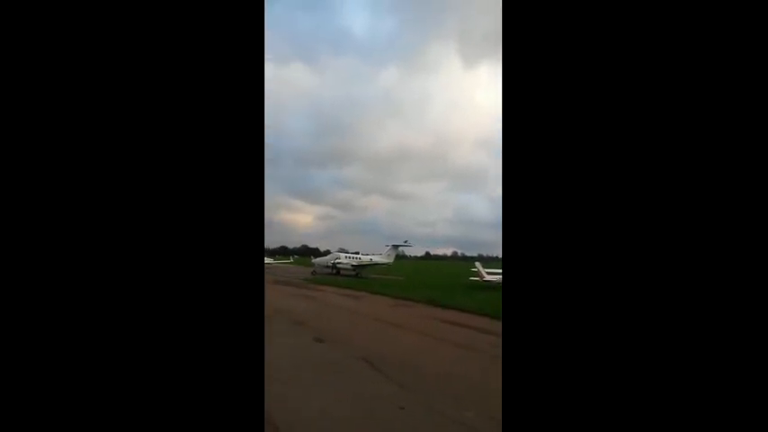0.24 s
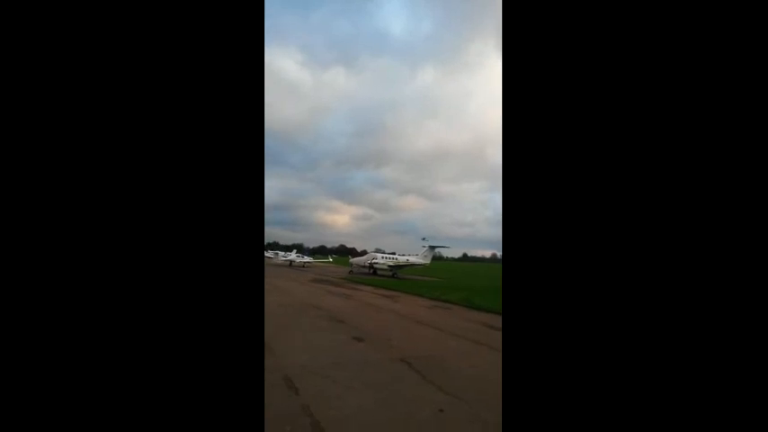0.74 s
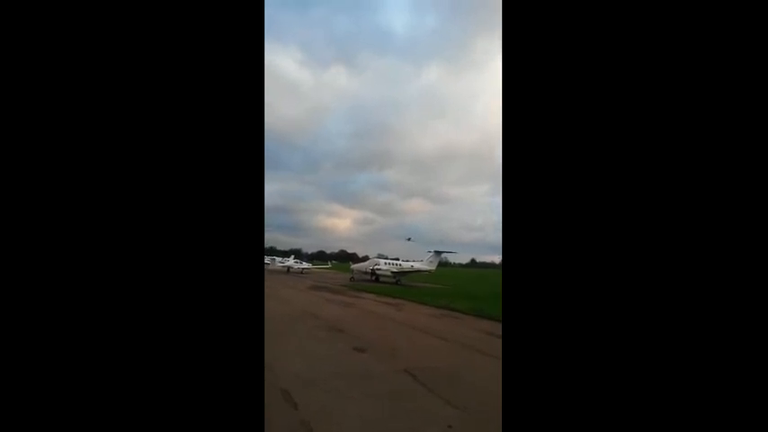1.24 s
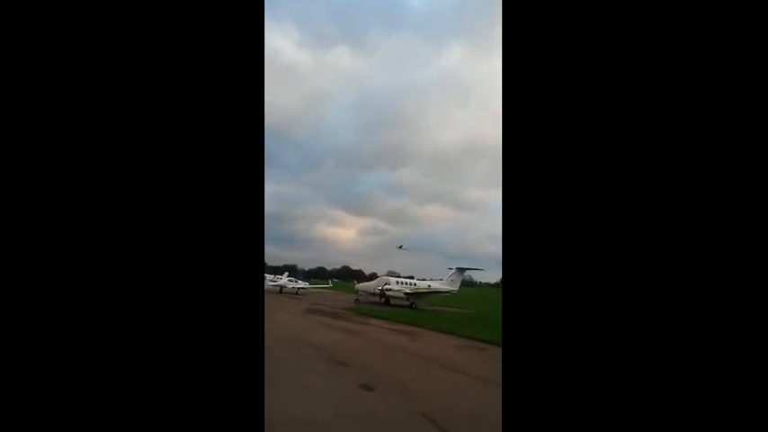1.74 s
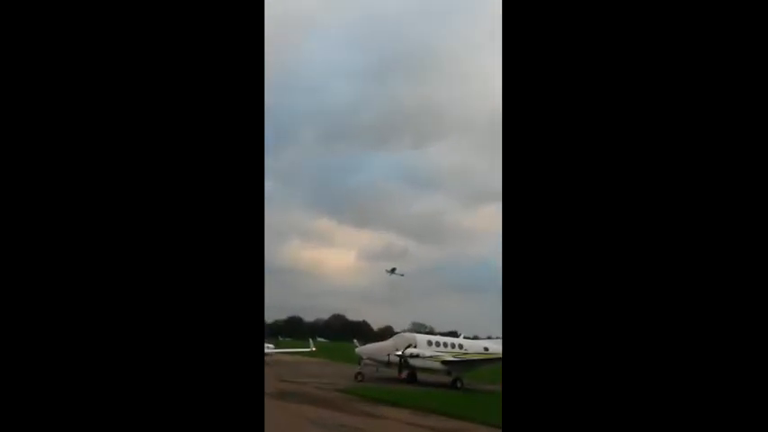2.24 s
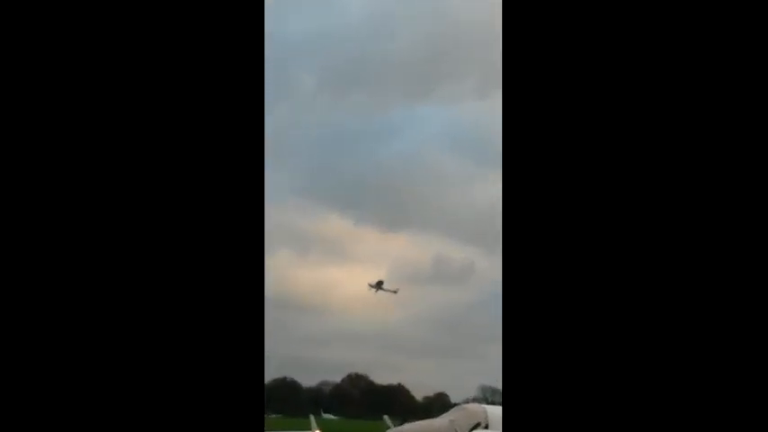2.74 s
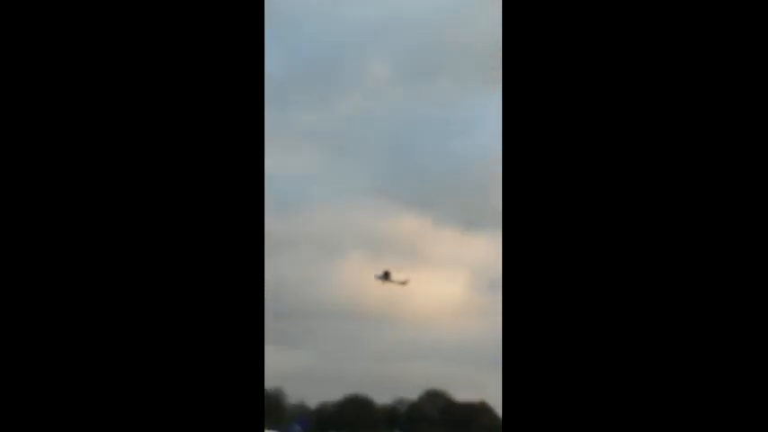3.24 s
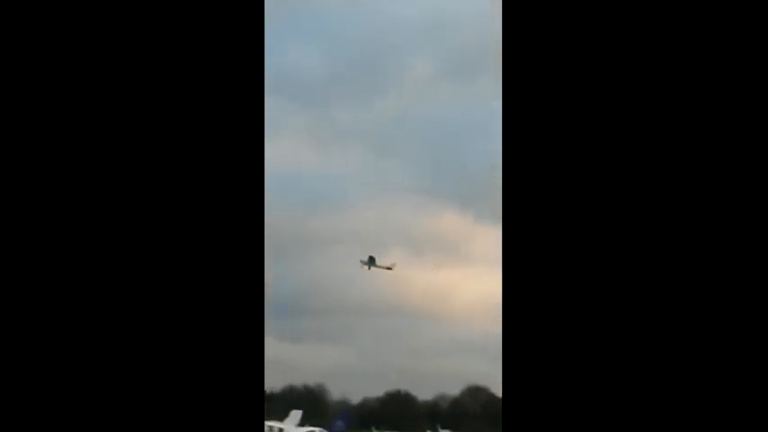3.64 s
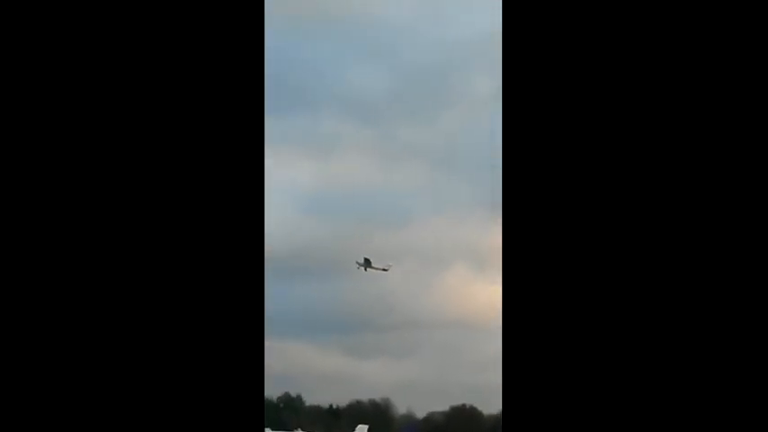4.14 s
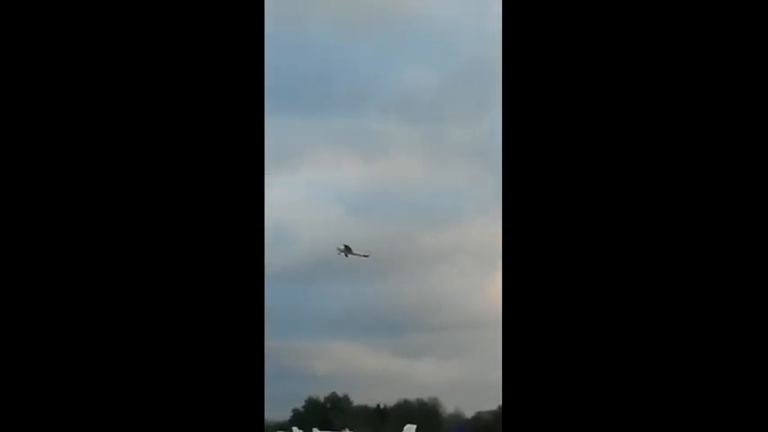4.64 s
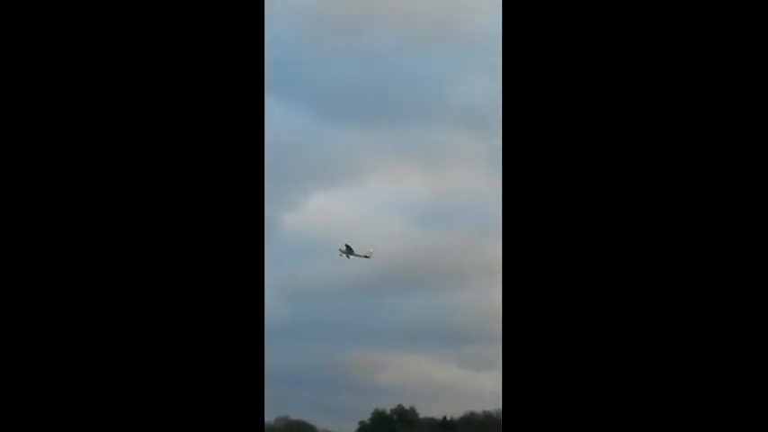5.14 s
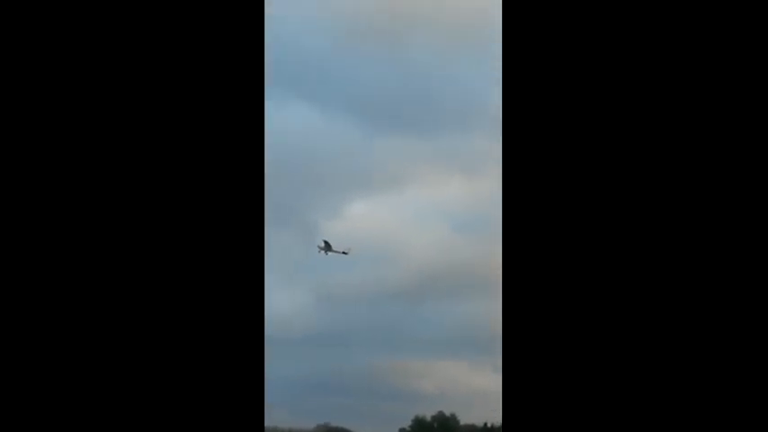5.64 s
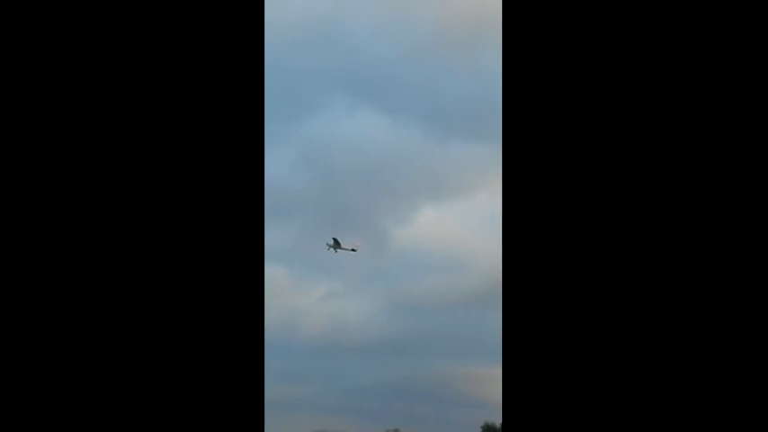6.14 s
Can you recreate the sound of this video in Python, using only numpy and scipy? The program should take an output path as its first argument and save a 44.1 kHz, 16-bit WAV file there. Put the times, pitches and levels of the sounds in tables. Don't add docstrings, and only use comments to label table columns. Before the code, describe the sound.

A handheld microphone on an open apron catches a light aircraft climbing past. Its low, throaty propeller buzz stays continuous, over a faint generator hum and thin turbine whine. Bright clicks and low wind buffets hit the right channel early, with a smaller group of clicks midway. The drone dips briefly, then returns stronger with more rasp, its pitch slowly falling, and does not fade away.

```python
import sys
import numpy as np
from scipy import signal
from scipy.fft import rfft, irfft
from scipy.io import wavfile
from scipy.ndimage import uniform_filter1d

SR = 44100
rng = np.random.default_rng(int(sys.argv[2]) if len(sys.argv) > 2 else 0)


def boost_factor(decibels):
    exponent = np.asarray(decibels, float) / 20
    return 10 ** exponent


def unload_wav(signal):
    wavfile.write(
        sys.argv[1],
        SR,
        np.round(np.clip(np.atleast_2d(signal).T, -1, 1) * 32767).astype(np.int16),
    )


N = 282224

# frequency in Hz, width in Hz, level in dB over the exhaust.
APRON_HUM = [(40.5, 3.0, -26), (521, 5.0, -16)]
# frequency in Hz, width in Hz, level in dB over the far hiss.
APRON_WHINE = [(4090, 32, -14), (7180, 59, -34)]
# multiple of the shaft rate, level in dB over the field noise.
GENERATOR_LINES = [(10, -3), (11, -6), (12, 6), (13, -6), (14, -2), (15, -1), (16, 5), (18, -4), (19, -3),
                   (21, -6)]
SHAFT_HZ = 10.005

# centre in seconds, peak in dB, width in seconds.
GUSTS = [(.27, -53, 0.0095), (.51, -49, .03), (.69, -36, .015), (.875, -15, 0.014), (.96, -35, 0.021),
         (1.15, -19, 0.017), (1.225, -13.5, 0.028), (1.31, -19, 0.037), (1.43, -14.5, 0.021),
         (1.54, -22, 0.011), (1.71, -24.5, 0.028), (1.83, -32, .02), (1.92, -32, 0.022), (2.02, -24, 0.012),
         (2.09, -28, 0.017), (2.15, -22, 0.013), (2.215, -17.5, 0.012), (2.31, -26, .013),
         (2.525, -25, 0.016), (2.67, -33, .025), (2.95, -39, .1), (3.19, -25, 0.013), (3.27, -33, 0.028),
         (3.87, -42, .015), (4.14, -32, 0.036), (4.24, -23, 0.019), (4.31, -45, 0.025), (4.42, -27, 0.012)]
# time in seconds, peak in dB.
EDDY_SLAPS = [
    (.84, -33),
    (1.204, -17),
    (1.230, -15.5),
    (1.277, -22.5),
    (1.319, -22),
    (1.414, -23),
    (1.455, -29),
    (2.02, -44),
    (4.379, -33),
]
CALM_DB = -65

# centre in seconds, peak in dB, width in seconds.
FINGER_SLIDES = [
    (.757, -27, 0.0086),
    (.81, -49, 0.023),
    (.87, -37, .02),
    (.93, -40.5, .03),
    (1.03, -41, 0.011),
]
# time in seconds, peak in dB, ring in Hz, excess over the limiter ceiling in dB,
# knock relative to the ring in dB.
FINGER_TICKS = [(0.6622, -19, 8100, -2, -23), (0.758, -22, 8260, 1, -30), (0.7681, -3, 8460, 1, -40),
                (0.854, -18, 8000, 1.5, -18), (0.9079, -7, 8350, 6.5, -32), (0.942, -26, 8190, -7, -13),
                (1.0296, -14.5, 8070, 1.5, -24), (3.217, -12, 8000, 0, -8), (3.3634, -6, 7860, 7.5, -20),
                (3.5134, -6.5, 8100, 5, -46), (3.5215, -7, 8000, 6.5, -26), (3.904, -13.5, 8470, 1, -35)]
TICK_LEFT_DB = -32
RING_CUT_HZ = 3400

# frequency in Hz, likeness of left and right from 0 to 1.
LIKENESS = [(60, .99), (270, .97), (580, .93), (1200, .72), (2500, .65), (5600, .5), (12000, .5)]
# frequency in Hz, left minus right in dB.
PORT_TILT = [(60, 3), (110, -7.5), (190, 0.5), (350, -4.5), (630, -2.5), (1140, -2), (2040, 6), (3680, 2),
             (6630, 4), (11900, -2.5)]
# frequency in Hz, lag of the left port in samples.
LEFT_LAG = [(60, 1), (1300, 0), (1800, -3), (2250, -1), (2600, 3), (3200, 4), (4000, 6), (13000, 6)]
NOTCH_HZ, NOTCH_WIDTH_HZ, NOTCH_SHARES = 1484, 176, [[0.72], [0.1]]
TOP_HZ = 12350

# time in seconds, field noise in dB, aeroplane in dB over it.
RUSH = [(0, -52, 8.5), (.4, -48.5, 4.5), (.8, -46.5, 10.5), (1.15, -49, 6.5), (1.62, -51.5, 8.5),
        (1.95, -46.5, 7), (2.2, -41, 7), (2.7, -40.5, 8), (3.0, -41, 9.5), (3.47, -43.5, 12.5),
        (3.55, -46.5, 12), (4.0, -46.5, 11), (4.45, -46.5, 9.5), (4.68, -41, 9), (5.0, -41.5, 10),
        (5.45, -41, 8), (5.85, -39, 10), (6.4, -41, 8)]
# centre in seconds, height in dB, width in seconds.
SWELLS = [(.03, 5.5, 0.1), (.18, 0, 0.054), (.71, 2.5, 0.021), (.84, 2.5, 0.026), (1.27, 1, 0.04),
          (1.7, 1.5, 0.024), (2.16, 1.5, 0.037), (.26, 2.5, 0.041), (4.3, 1, 0.11), (4.5, 2, 0.11),
          (4.9, 0.5, 0.026), (5.0, 2.5, 0.078), (5.22, 1.5, 0.063), (5.78, 1, 0.036), (5.95, 1, .05)]
# frequency in Hz, level in dB per Hz.
EXHAUST = [(40, -30), (70, 11.5), (130, 6), (220, 8), (360, -6), (560, 2.5), (900, -1), (1250, 5.5),
           (1600, -12)]
# frequency in Hz, level in dB per Hz.
AIRFRAME = [(820, -18), (1400, 1.5), (1540, 1), (1670, 5.5), (1910, -0.5), (2600, 0.5), (3300, -7),
            (4290, -7), (7260, -120)]
# frequency in Hz, level in dB per Hz.
HISS = [(1760, -26), (3000, -22), (3200, -6), (4250, 0), (4980, -3.5), (6780, -2.5), (7990, -2.5),
        (9600, -4), (11600, -8), (12300, -8.5), (16000, -46), (22000, -120)]
SLOW_PATCHES = 0.83
AIRFRAME_DB, AIRFRAME_SHARE, AIRFRAME_CLEARS, AIRFRAME_SWELLS = 1, 0.15, 0.19, 2.2
# time in seconds, turbine whistle in Hz, clarity of the upper harmonics in dB,
# whistle in dB over the far hiss.
NEARNESS = [(0, 8330, -8.5, -10), (.8, 8400, -7.5, 0.5), (1.5, 8210, -9, -7), (2.3, 8160, -6.5, 1),
            (3.2, 7900, -8, -2.5), (3.9, 7710, -8, -5.5), (4.4, 7500, -4.5, -9), (4.9, 7640, -3.5, -7),
            (5.3, 7740, -2, -6.5), (5.8, 7850, -2.5, -8), (6.4, 7800, -3, -4)]
WHISTLE_TILT_DB = -6.5

# time in seconds, rate in Hz.
BLADE_RATE = [(0, 84.7), (.8, 84.4), (1.8, 83.1), (2.3, 82.7), (2.8, 82.8), (3.3, 82.4), (4.3, 81.2),
              (5.0, 81.0), (5.7, 80.4), (6.4, 80.4)]
# time in seconds, blade load in dB over the exhaust, lag of the ground echo in ms.
BLADE_LOAD = [(0, -0.5, 8.05), (.45, 0, 7.75), (.9, -2.5, 8.57), (1.6, -2, 8.55), (2.0, -2.5, 8.4),
              (2.4, -4, 8.9), (2.8, -0.5, 8.64), (3.2, 0, 8.87), (3.7, -3, 9.0), (4.0, -5, 8.6),
              (4.25, -2, 8.3), (4.6, 0, 8.08), (5.0, 0, 7.84), (5.4, 2, 8.67), (5.9, -0.5, 8.35),
              (6.4, 4, 8.86)]
LOW_DB = [5.5, 9.5, -3.5]
# multiple of the blade rate, level in dB over the exhaust.
UPPER = [(4, -8.5), (5, -11.5), (6, -8.5), (7, -7), (8, -11), (9, -12), (10, -20), (11, -34), (12, -22),
         (13, -50), (14, -18)]
ECHO_SHARE, THIRD_CLEARS = 0.74, 0.63
WALL_SHARE, WALL_MS_PER_S = 0.22, 3.6
WALL_IN_STEP_S = [5.96, 4.755, 5.636, 4.5]


def rms_one(x):
    return x / np.sqrt(np.mean(x ** 2) + 1e-20)


def evened(x):
    return x / np.sqrt(uniform_filter1d(x ** 2, size=1800) + .05)


def in_time(rows):
    s, *columns = np.transpose(rows)
    return [np.interp(np.arange(N) / SR, s, c) for c in columns]


def at_hz(points, hz):
    points_hz, values = np.array(points).T
    return np.interp(np.log(hz), np.log(points_hz), values)


def bumps(rows, height):
    t = np.arange(N) / SR
    return sum(height(db) * np.exp(-.5 * ((t - s) / width) ** 2) for s, db, width in rows)


def drift(rate):
    r = np.exp(-80 * np.pi * rate / SR)
    white = rng.standard_normal(N // 40 + 2002)
    slow = signal.lfilter([1], [1, -2 * r, r * r], white)[2000:]
    return np.interp(np.arange(N) / 40, np.arange(len(slow)), rms_one(slow))


def resonance(x, hz, width_hz):
    r = np.exp(-np.pi * width_hz / SR)
    zeros = np.array([1, 0, -1]) * (1 - r * r) / 2
    poles = [1, -2 * r * np.cos(2 * np.pi * hz / SR), r * r]
    return signal.lfilter(zeros, poles, x + 1e-18)


def ports(left, right, hz):
    balance_db = at_hz(PORT_TILT, hz) * np.array([[.5], [-.5]])
    return np.array([np.roll(left, round(at_hz(LEFT_LAG, hz))), right]) * boost_factor(balance_db)


def banded_noise(spectrum, per_octave, patchy_db):
    low_hz, high_hz = spectrum[1][0] * .8, min(spectrum[-2][0], 13000)
    edges = np.geomspace(low_hz, high_hz, int(per_octave * np.log2(high_hz / low_hz)) + 2)
    out, together, white = 0, drift(8.0), rng.standard_normal((2, 2, N))
    for k, (low, high) in enumerate(zip(edges, edges[1:])):
        band = signal.butter(2, [low, high], "band", fs=SR, output="sos")
        mid, side = signal.sosfilt(band, white[k % 2])
        hz = np.sqrt(low * high)
        alike = np.clip(at_hz(LIKENESS, hz), 0, 1)
        mid, side = np.sqrt(1 + alike) * mid, np.sqrt(1 - alike) * side
        flicker = 0.45 * together + drift(15.3) + SLOW_PATCHES * drift(2.0)
        level = boost_factor(at_hz(spectrum, hz) + patchy_db * flicker)
        out = out + level * ports(mid + side, mid - side, hz)
    return rms_one(out)


def apron_engine(lines, base_db):
    out = 0
    for hz, width_hz, level_db in lines:
        once = resonance(rng.standard_normal(N), hz, width_hz)
        line = rms_one(resonance(once, hz, width_hz))
        out = out + boost_factor(base_db + level_db) * ports(line, line, hz)
    return out


def generator(field_db):
    out, turn = 0, 2 * np.pi * SHAFT_HZ * np.arange(N) / SR
    for k, level_db in GENERATOR_LINES:
        level = boost_factor(field_db + level_db + drift(3.0))
        tone = np.sqrt(2) * level * np.cos(k * turn + rng.uniform(0, 2 * np.pi))
        out = out + ports(tone, tone, k * SHAFT_HZ)
    return out


def random_kicks(per_second, spread_db, most):
    strength = boost_factor(spread_db * np.minimum(rng.exponential(1, N), most))
    return (rng.random(N) < per_second / SR) * strength * rng.choice([-1, 1], N)


def eddy_slaps():
    slaps = np.zeros(N)
    slaps[[round(s * SR) for s, db in EDDY_SLAPS]] = boost_factor(np.array(EDDY_SLAPS)[:, 1] + 22)
    soft = signal.lfilter([.1], [1, -1.82, .83], slaps)
    return resonance(resonance(soft, 420, 500), 300, 700)


def wind():
    gust = boost_factor(CALM_DB) + bumps(GUSTS, boost_factor)
    pushes = random_kicks(180, 2.1, 3)
    eddies = rms_one(pushes) + .9 * rng.standard_normal(N)
    eddies = signal.sosfilt(signal.butter(2, 600, fs=SR, output="sos"), eddies)
    body = rms_one(resonance(resonance(eddies, 105, 58), 174, 141))
    rumble = rms_one(resonance(resonance(eddies, 52, 40), 55, 60))
    edge = rms_one(resonance(resonance(eddies, 190, 300), 195, 380))
    right = gust * evened(body + boost_factor(-8) * rumble + boost_factor(-14.5) * edge) + eddy_slaps()
    sheltered = rms_one(resonance(resonance(rng.standard_normal(N), 70, 90), 80, 120))
    left = boost_factor(-47 + 3.0 * drift(5.0)) * sheltered
    return np.array([left, right])


def rub():
    slips = random_kicks(1500, 3.0, 4)
    ringing = rms_one(resonance(resonance(slips, 8700, 1400), 7360, 1400))
    return bumps(FINGER_SLIDES, boost_factor) * ringing * boost_factor([[-20], [0]])


def ticks():
    out = np.zeros((2, N))
    t = np.arange(400) / SR
    high_pass = signal.butter(2, RING_CUT_HZ, "high", fs=SR, output="sos")
    for s, peak_db, hz, over_db, knock_db in FINGER_TICKS:
        i = round((s + 0.0011) * SR)
        envelope = (1 - np.exp(-t / 0.000094)) ** 2 * np.exp(-t / 0.00043) * 1.73
        ring = signal.sosfilt(high_pass, np.sin(2 * np.pi * hz * t) * envelope)
        knock = boost_factor(knock_db) * np.sin(2 * np.pi * 2300 * t) * np.exp(-t / 0.00024)
        both = np.array([boost_factor(TICK_LEFT_DB) * ring + knock, ring + knock])
        out[:, i:i + len(t)] += boost_factor(peak_db + 8.5 + max(0, over_db)) * both
    return out


def band_limit(x):
    hz, spectrum = np.fft.rfftfreq(N, 1 / SR), rfft(x)
    out = irfft(spectrum * (hz <= 10500) / np.sqrt(1 + (55 / (hz + 1)) ** 8), N)
    flutter = drift(22.0)
    for low_hz, high_hz, openness in [(10500, 11600, 1.5), (11600, TOP_HZ, .3)]:
        band = irfft(spectrum * (hz > low_hz) * (hz <= high_hz), N)
        out += band * 1.62 / (1 + np.exp(-1.6 * flutter - openness))
    return out


def whistle(hiss_db):
    centre_hz, clear_db, over_db = in_time(NEARNESS)
    low_pass = signal.butter(2, 380, fs=SR, output="sos")
    slow = signal.sosfilt(low_pass, rng.standard_normal((2, 2, N)))
    carrier = np.exp(2j * np.pi * np.cumsum(centre_hz) / SR)
    left, right = rms_one(np.real((slow[0] + 1j * slow[1]) * carrier))
    tilt = boost_factor([[WHISTLE_TILT_DB / 2], [-WHISTLE_TILT_DB / 2]])
    return boost_factor(hiss_db + over_db + 2.5 * drift(16.0)) * tilt * ports(left, right, 8000)


def puffs(turn, depth, uneven):
    return rms_one(np.exp(depth * np.cos(turn + .7) + uneven * np.cos(turn / 2)))


def blade_tones(blade_hz, exhaust_db):
    load_db, lag_ms = in_time(BLADE_LOAD)
    k = np.arange(1, 4)[:, None]
    echo = np.abs(1 + ECHO_SHARE * np.exp(2j * np.pi * k * blade_hz * lag_ms / 1000))
    clears_db = THIRD_CLEARS * (k == 3) * in_time(NEARNESS)[1]
    return exhaust_db + load_db + np.array(LOW_DB)[:, None] + 20 * np.log10(echo) + clears_db


def wall_db(k, blade_hz):
    lag = WALL_MS_PER_S / 1000 * (np.arange(N) / SR - WALL_IN_STEP_S[min(k, 4) - 1])
    beat = np.cos(2 * np.pi * k * np.mean(blade_hz) * lag)
    return 10 * np.log10(1 + WALL_SHARE ** 2 + 2 * WALL_SHARE * beat)


def propeller(turn, blade_hz, low_db, exhaust_db):
    out, waver, clear_db = 0, drift(18.5), in_time(NEARNESS)[1]
    levels = [(k + 1, db + 1.5) for k, db in enumerate(low_db)]
    levels += [(k, exhaust_db + clear_db + db - 0.5) for k, db in UPPER]
    for k, level_db in levels:
        shimmer_db = .7 * np.sqrt(k) * (.6 * waver + .8 * drift(6.0))
        lean = 1.1 + .05 * k * drift(5.0)
        level = boost_factor(level_db + shimmer_db + wall_db(k, blade_hz))
        tone = np.sqrt(2) * level * np.cos(k * (turn + .026 * waver) - lean)
        out = out + ports(tone, tone, k * np.mean(blade_hz))
    return out


def scene():
    blade_hz, = in_time(BLADE_RATE)
    field_db, over_db = in_time(RUSH)
    clear_db, swell_db = in_time(NEARNESS)[1], bumps(SWELLS, float)
    exhaust_db, hiss_db = field_db + over_db + swell_db, field_db + swell_db
    airframe_db = field_db + AIRFRAME_DB + AIRFRAME_SHARE * (over_db - 10.5)
    airframe_db = airframe_db + AIRFRAME_CLEARS * clear_db + AIRFRAME_SWELLS * swell_db
    turn = 2 * np.pi * np.cumsum(blade_hz) / SR
    near = boost_factor(clear_db)

    apron = apron_engine(APRON_HUM, exhaust_db) + apron_engine(APRON_WHINE, hiss_db) + generator(field_db)
    exhaust = boost_factor(exhaust_db) * puffs(turn, 0.5 * near, uneven=0.06)
    exhaust = exhaust * banded_noise(EXHAUST, per_octave=2, patchy_db=2.0)
    airframe = boost_factor(airframe_db + 2.0) * puffs(turn, 0.51 * near, uneven=0.025)
    airframe = airframe * banded_noise(AIRFRAME, per_octave=3, patchy_db=1.13)
    hiss = boost_factor(hiss_db + 0.5) * puffs(turn, 0.14 * near, uneven=0.18)
    hiss = hiss * banded_noise(HISS, per_octave=5, patchy_db=1.34)
    rush = exhaust + airframe + hiss + whistle(hiss_db)
    cancelled = np.array(NOTCH_SHARES) * resonance(rush, NOTCH_HZ, NOTCH_WIDTH_HZ)
    rush = band_limit(rush - cancelled + rub())
    low_db = blade_tones(blade_hz, field_db + over_db)
    return propeller(turn, blade_hz, low_db, exhaust_db) + rush + apron + wind() + ticks()


def limiter_gain():
    t, down_db = np.arange(N) / SR, np.zeros(N)
    for s, peak_db, hz, over_db, knock_db in FINGER_TICKS:
        ahead = np.clip((t - s + .03) / .022, 0, 1)
        release = np.exp(-np.clip(t - s - .006, 0, 9) / 0.012)
        down_db = np.maximum(down_db, over_db * ahead * release)
    return boost_factor(-down_db)


def top_cut(x):
    return signal.sosfilt(signal.butter(12, 15200, fs=SR, output="sos"), x)


def record(dry):
    mix = np.clip(dry * limiter_gain(), -.96, .96)
    return top_cut(mix)


dry = scene()
out = record(dry)
unload_wav(out)
```